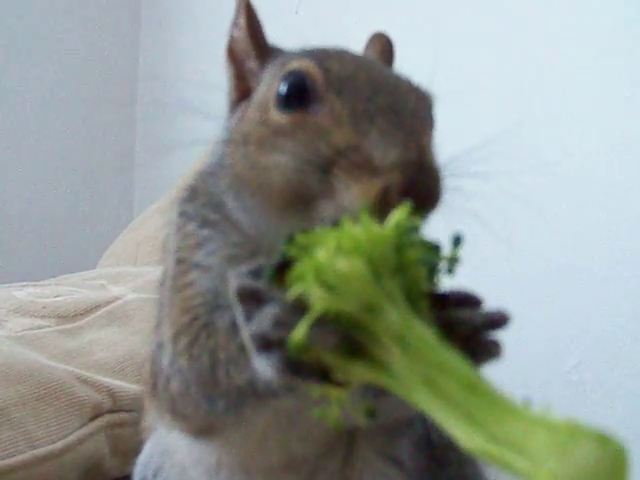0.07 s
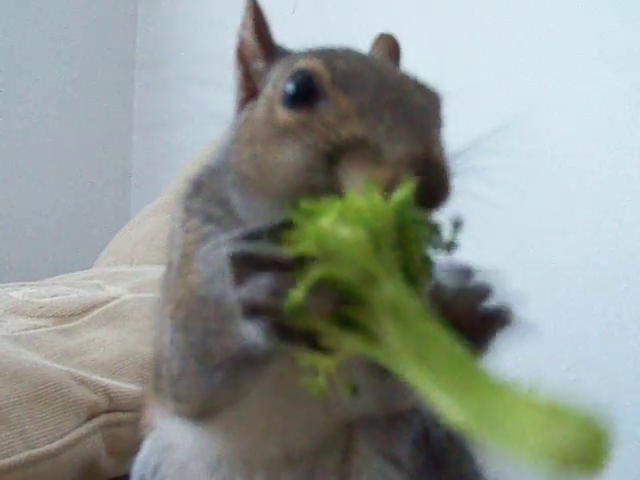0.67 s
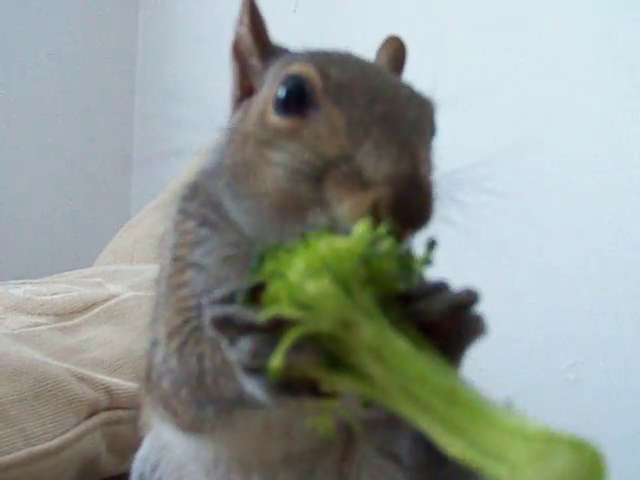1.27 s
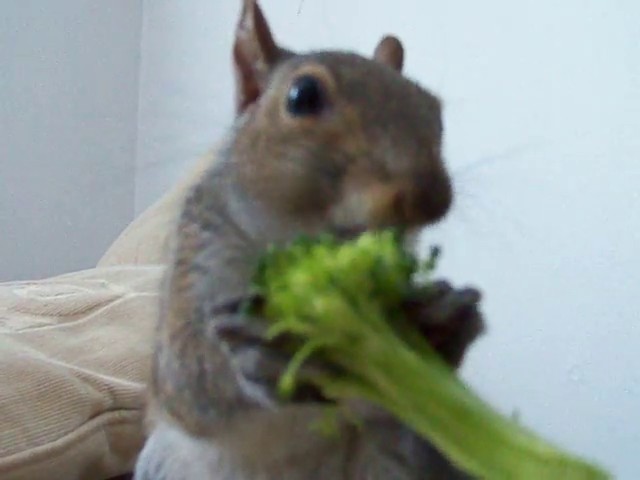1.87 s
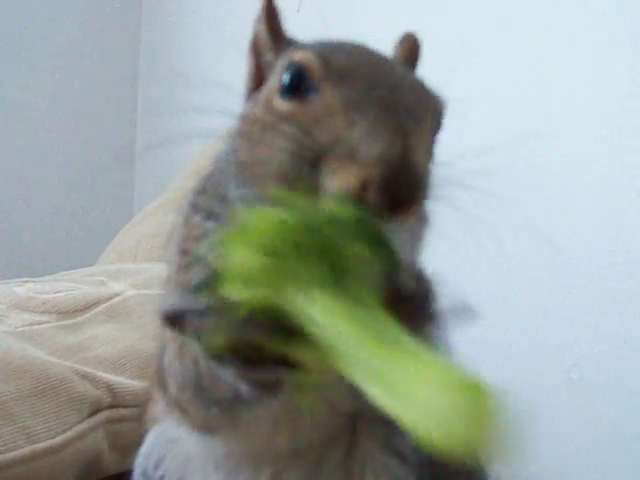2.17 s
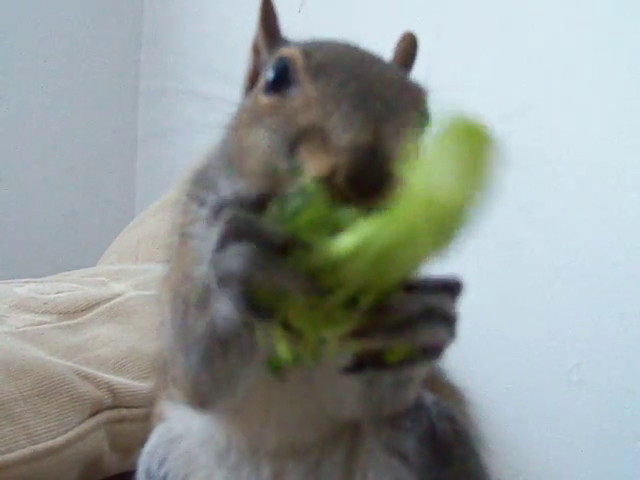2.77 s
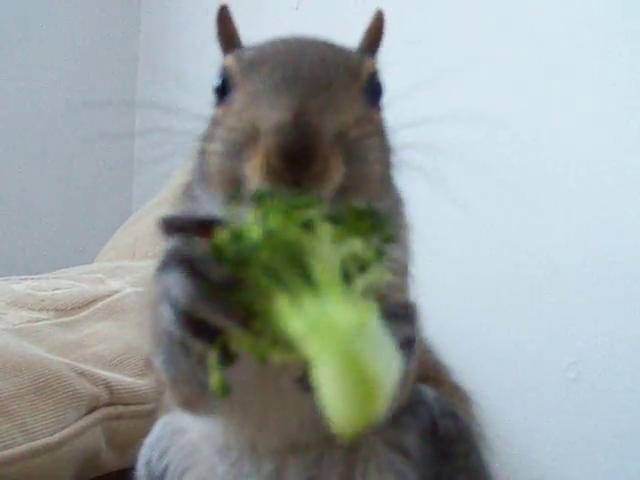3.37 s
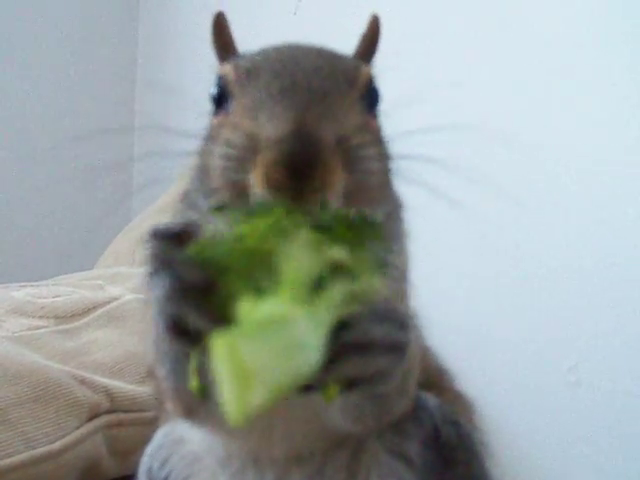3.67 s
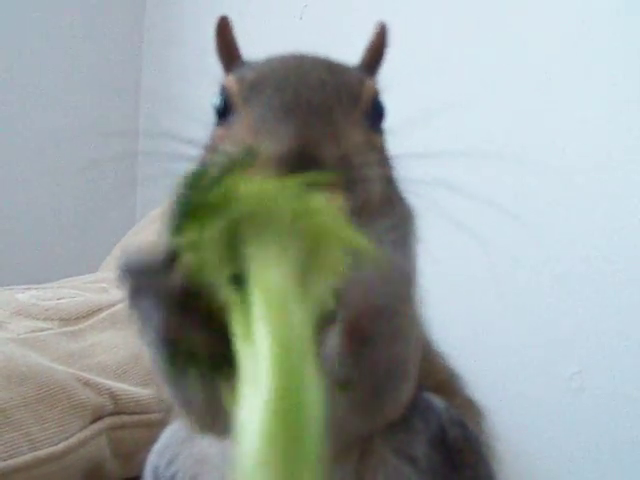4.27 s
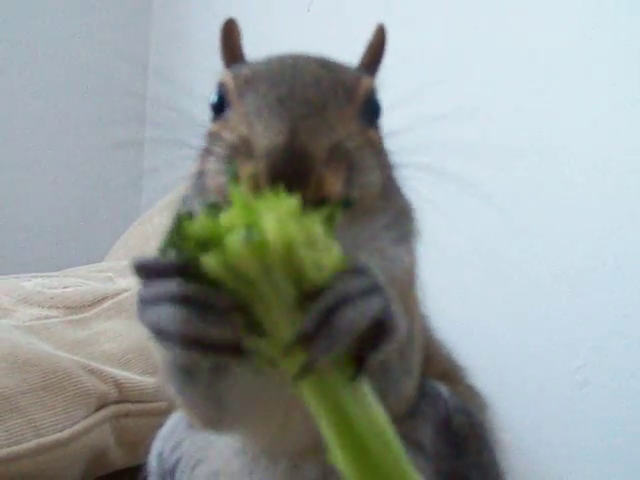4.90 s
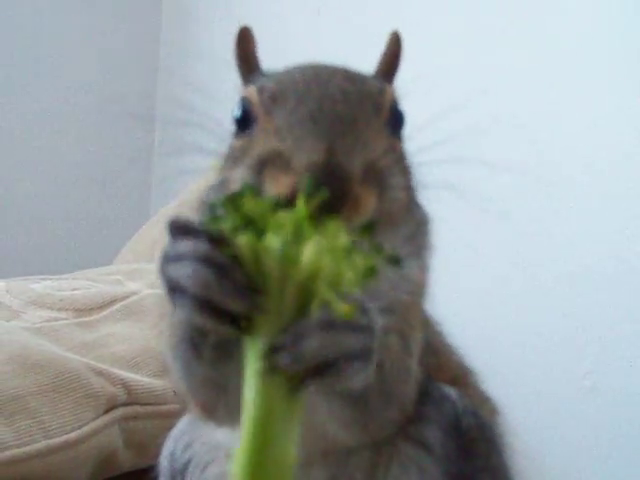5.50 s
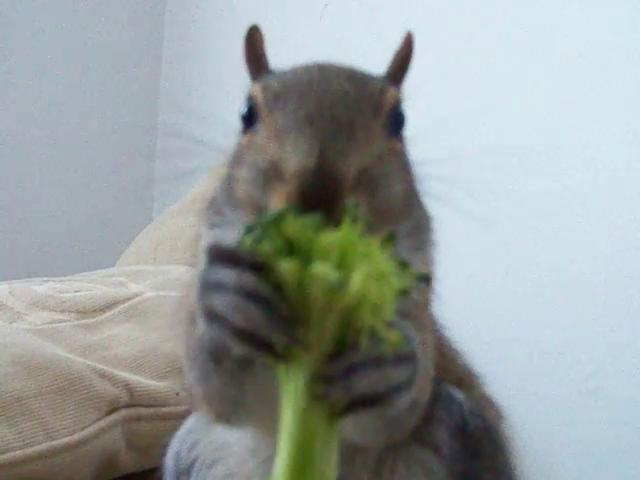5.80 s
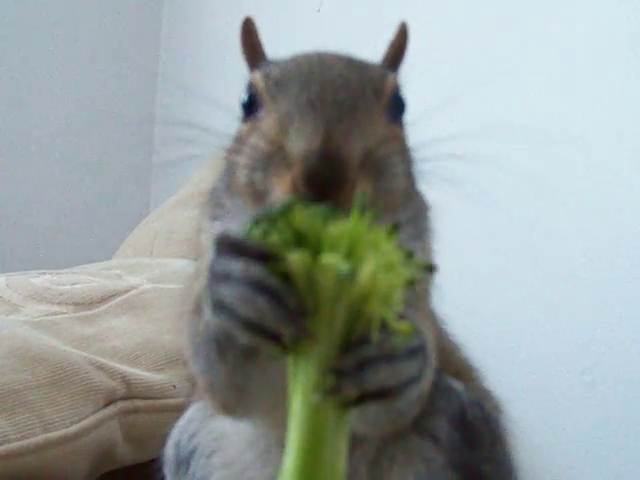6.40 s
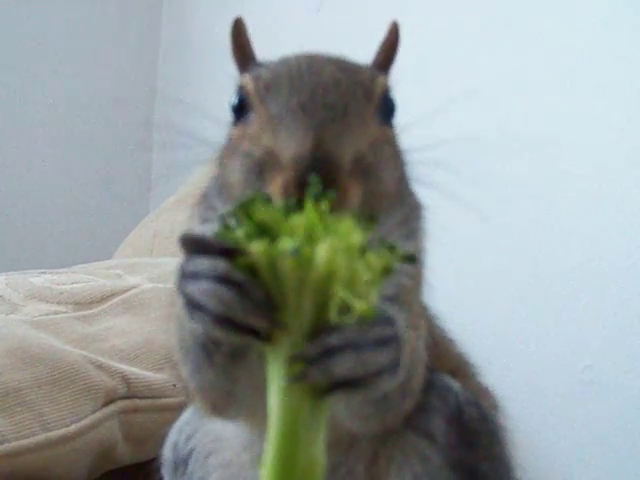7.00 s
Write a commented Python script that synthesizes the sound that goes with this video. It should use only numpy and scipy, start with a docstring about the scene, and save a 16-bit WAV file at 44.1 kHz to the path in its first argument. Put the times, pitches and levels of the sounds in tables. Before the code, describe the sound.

A squirrel nibbles broccoli close to the microphone, with small sharp snaps and soft crunching over a low hum and faint hiss.

```python
"""A squirrel nibbles a broccoli floret close to a small camera microphone in a quiet room.
Its teeth snap crisp stalks in sharp single cracks, and every chew crushes a small cloud of cells.
Under it lie a low mains hum, a faint rumble and a steady hiss."""
import sys
import numpy as np
from scipy import signal
from scipy.fft import rfft, irfft
from scipy.io import wavfile

SR = 44100
rng = np.random.default_rng(int(sys.argv[2]) if len(sys.argv) > 2 else 0)


def wrap_up_sound(samples):
    """Save the sound to the file named by the first command line argument, as 16-bit audio."""
    columns = np.atleast_2d(samples).T
    # keep every value between -1 and 1, then stretch to whole-number steps
    tamed = np.clip(columns, -1, 1)
    steps = np.round(tamed * 32767).astype(np.int16)
    wavfile.write(sys.argv[1], SR, steps)


N = 310905

# stalks snapping: (s, crack dB, ring Hz, ring over crack dB)
SNAPS = [(0.1684, -17.5, 3000, 12), (0.1993, -16, 2050, 5), (0.3566, -17, 2050, 8), (0.3596, -15, 2000, 9),
         (0.7854, -17.5, 6850, 0), (0.8128, -14, 6350, 0), (0.8155, -4, 6400, 17), (0.8158, -2.5, 4330, 16),
         (0.818, -19, 6350, -2), (0.8215, -23, 6750, -4), (0.825, -15.5, 4050, -6), (0.833, -20, 4500, 0),
         (0.8362, -21, 4200, -4), (0.9307, -16, 6700, -3), (0.9334, -10, 4450, 5), (0.9464, -4, 6450, 7),
         (0.95, -5, 4600, 2), (0.9525, -16, 5500, 7), (0.9551, -21, 6200, 2), (0.9594, -13, 6150, 14),
         (0.9864, -13, 6700, 7), (1.0606, -22, 6900, -1), (1.281, -16.5, 6500, -4), (1.314, -14, 2750, 3),
         (1.467, -20, 2800, 5), (1.4699, -17, 2350, 3), (1.498, -13.5, 2900, 3), (1.6264, -11, 1950, 2),
         (1.6308, -15, 2050, 1), (1.633, -15, 2100, 13), (1.6366, -10, 2200, -8), (1.7018, -18, 2550, 10),
         (1.7082, -13.5, 2550, 22), (1.7728, -12.5, 2600, 9), (1.8713, -12, 2150, 4), (2.101, -11.5, 2100, 10),
         (2.1048, -21, 1950, 9), (2.1072, -17, 1900, 16), (2.1096, -18, 2100, 8), (2.1782, -12, 2000, 11),
         (2.3528, -11.5, 2100, 6), (2.4322, -10.5, 1900, 10), (2.4357, -20, 2050, 3), (2.4847, -17, 2450, 3),
         (2.7371, -3, 6450, 16), (2.7402, -11.5, 6700, 5), (2.7436, -12, 6300, 10), (2.7674, -14, 6450, 10),
         (2.8454, -12.5, 5950, 4), (2.9155, -17.5, 3000, 2), (2.9368, -10.5, 6500, -0.5), (2.9615, -18.5, 6150, 6),
         (3.1972, -8.5, 2100, 19), (3.2351, -18.5, 3150, 7), (3.2867, -16.5, 2350, 6), (3.5045, -18.5, 2550, -6),
         (3.529, -13, 2150, 9), (3.592, -18, 2650, -3), (3.606, -15.5, 1900, -3), (3.7671, -11, 1900, 9),
         (3.7709, -11.5, 1900, 4), (3.807, -18.5, 3250, 5), (3.8424, -12, 2100, 14), (3.8463, -8.5, 2050, 10),
         (3.8492, -13.5, 2400, 13), (3.8806, -19, 2950, 28), (3.8922, -14.5, 2800, 16), (3.9221, -19.5, 5500, -1),
         (3.9884, -19, 1900, 1), (4.0159, -11.5, 2550, 7), (4.0187, -15, 2400, 2), (4.1348, -17.5, 7200, 16),
         (4.2496, -16, 2750, 24), (4.2543, -19, 2350, 24), (4.3354, -14, 2050, 8), (4.6663, -20.5, 6350, -2),
         (4.8018, -6, 6500, 12.5), (4.8529, -9.5, 6800, 4.5), (4.963, -9.5, 5850, 12), (4.9661, -8, 6350, 18),
         (4.971, -7.5, 6300, 2), (5.1763, -13, 6600, 6), (5.1766, -11.5, 3040, 20), (5.4205, -17.5, 2700, 4),
         (5.4221, -9.5, 6000, 7), (5.4334, -13, 6350, 6), (5.4572, -14, 6650, 29), (5.5376, -17.5, 2100, 2),
         (5.547, -15, 2300, -2), (5.5541, -11.5, 6450, 5), (5.556, -17, 6650, 8), (5.6026, -11, 7050, 9),
         (5.711, -18, 7400, 20), (5.952, -20, 3000, 20), (6.1171, -17, 2650, 2), (6.1534, -18, 2200, 8),
         (6.1584, -18, 3400, 10), (6.2186, -7.5, 2250, 6), (6.2214, -18.5, 2350, 22), (6.281, -13, 2750, 9),
         (6.3148, -19, 5250, 10), (6.4532, -11, 1900, 1.5), (6.4573, -17, 1900, 4), (6.5229, -14, 2150, 22),
         (6.5256, -16.5, 2300, 24), (6.6911, -10.5, 2350, 6), (6.6956, -18, 2450, 22), (6.8123, -20, 7200, 8),
         (6.8792, -11.5, 6200, 8), (6.8843, -10, 6300, 0), (6.889, -15, 6700, 9)]
# chews that crush many small cells: (s, mouth resonance Hz, mouth dB, crisp crunch dB)
CHEWS = [(0.174, 2620, -64, -65), (0.267, 2650, -60, -66), (0.361, 1900, -65, -63), (0.503, 2100, -61, -66),
         (0.568, 2840, -63, -67), (0.635, 2950, -73, -63), (0.824, 3500, -62, -62), (0.875, 2850, -70, -60.5),
         (0.958, 3250, -67, -56.5), (1.301, 3050, -57.5, -58), (1.363, 2150, -62.5, -62), (1.473, 2600, -59, -59.5),
         (1.631, 2500, -62, -68), (1.781, 2400, -61, -61.5), (1.934, 2880, -63.5, -70), (2.022, 2600, -65, -62),
         (2.111, 2000, -60, -59.5), (2.177, 2600, -63, -64), (2.45, 2100, -65, -63), (2.74, 3000, -66, -75),
         (2.847, 2980, -61, -61), (2.928, 3170, -60, -65), (3.43, 3550, -63, -62.5), (3.528, 2250, -68, -62.5),
         (3.615, 1930, -60.5, -67), (3.767, 2050, -63, -62), (3.894, 2600, -66, -59), (3.936, 2730, -62, -64),
         (4.054, 2950, -69, -66), (4.096, 3250, -68, -64), (4.138, 2500, -68, -64), (4.244, 1900, -63, -65),
         (4.787, 1900, -75, -65), (4.904, 3700, -72, -60.5), (4.99, 2750, -73, -61.5), (5.557, 2980, -63, -65),
         (6.113, 3020, -61.5, -66), (6.16, 2000, -58, -62), (6.3, 2700, -60, -61.5), (6.458, 1950, -62, -71),
         (6.589, 3050, -62, -63.5), (6.885, 3250, -57.5, -73)]
# soft knocks as the paws turn the floret: (s, dB)
KNOCKS = [(3.771, -53), (3.8065, -47)]
# what a knock rings with: (Hz, dB, t60 s)
KNOCK_MODES = [(420, -6, 0.036), (680, 7, 0.013), (910, -2, 0.014)]
# room rumble: (Hz, dB per Hz)
RUMBLE = [(18, -86.5), (29, -78.5), (40, -77.5), (48, -72), (73, -71), (88, -82.5), (104, -76.5), (124, -73.5),
          (162, -75.5), (190, -85.5), (220, -85), (265, -94)]
# hiss: (Hz, dB per Hz)
HISS = [(400, -92), (550, -90.0), (700, -90), (850, -93), (1150, -94), (1500, -96.5), (2200, -97.5),
        (3000, -98), (3700, -99.5), (5200, -100.6), (6700, -100.5), (7500, -101.3), (8400, -103.6)]
# mains hum: (multiple, dB rms)
HUM = [(1, -44), (2, -63.5), (4, -70), (12, -76)]
MAINS_HZ = 58.97   # fixed
# narrow dips in the microphone's response: (Hz, width Hz, depth dB)
DIPS = [(301, 77, -16), (962, 61, -14)]
# background width: (Hz, side minus mid dB)
WIDTH = [(60, -16.5), (150, -12), (350, -6), (1000, -5.5), (7000, -4.5)]
# snaps lean left, those near 4.5 kHz most and the highest hardly at all: (Hz, left minus right dB)
LEAN = [(2500, 11), (4500, 12.5), (6500, -0.5)]
CUTOFF_HZ = 8950   # fixed


def from_db(db):
    """Decibels to gain."""
    return 10 ** (np.asarray(db) / 20)


def at_hz(points, hz):
    """Read a table on a log-frequency axis."""
    known, values = np.transpose(points)
    return np.interp(np.log(np.maximum(hz, 1)), np.log(known), values)


def cut(x, hz, kind, order=2):
    """Butterworth filter."""
    return signal.sosfilt(signal.butter(order, hz, kind, fs=SR, output="sos"), x + 1e-18)


def resonance(x, hz, width_hz):
    """Two-pole resonance with gain 1 on top."""
    r = np.exp(-np.pi * width_hz / SR)
    return signal.lfilter(np.array([1, 0, -1]) * (1 - r * r) / 2, [1, -2 * r * np.cos(2 * np.pi * hz / SR), r * r], x + 1e-18)


def pan(x, lean_db):
    """Share a sound between left and right, keeping its mid level."""
    gains = from_db(np.array([[1], [-1]]) * lean_db / 2)
    return x * gains / gains.mean()


def add(out, s, sound):
    """Mix a short sound in at time s."""
    at = int(np.clip(round(s * SR), 0, N - 1))
    out[..., at:at + sound.shape[-1]] += sound[..., :N - at]


def steady_noise(spectrum):
    """Stereo noise of a given density, wider towards the treble."""
    hz = np.arange(N // 2 + 1) * SR / N
    mid, side = rfft(rng.standard_normal((2, N))) * from_db(at_hz(spectrum, hz)) * np.sqrt(SR / 2)
    side = side * from_db(at_hz(WIDTH, hz))
    return irfft(np.array([mid + side, mid - side]), N)


def snaps(width_hz=850, width_share=0.15, low_hz=1000, low_share=0.31, soft_ratio=2.35, crack_lean_db=6.0, level_db=.5):
    """Each fracture is one sharp crack that rings the broken piece and the mouth for about a millisecond."""
    out = np.zeros((2, N))
    for s, crack_db, hz, ring_db in SNAPS:
        # the smaller the piece, the higher it rings, the faster it breaks and the less bass it radiates
        crack = cut(signal.unit_impulse(512), low_hz + low_share * hz, "high")
        crack = cut(crack, min(soft_ratio * hz, SR / 2.5), "low", order=1)
        width = width_hz + width_share * hz
        ring = from_db(ring_db) * resonance(resonance(crack, hz, width), hz, width)
        both = pan(crack, crack_lean_db) + pan(ring, at_hz(LEAN, hz))
        add(out, s, from_db(crack_db + level_db) * both / (1 + from_db(ring_db)))
    return out


def chewing(chew_s=0.009, per_s=1100, spread_db=8.0, mouth_width_hz=1100, crisp_low_hz=4200, crisp_high_hz=7400, mouth_gain_db=0.0, crisp_gain_db=1.5):
    """Each chew is a swell of pops: inside the mouth they ring its cavity, at the front teeth they stay crisp."""
    out, t = np.zeros((2, N)), np.arange(SR // 10) / SR
    middle = t.mean()
    swell = np.exp(-((t - middle) / (2 * chew_s)) ** 2)
    for s, mouth_hz, mouth_db, crisp_db in CHEWS:
        inside, front = (swell * pops(per_s, spread_db, size=len(t)) for _ in range(2))
        mouth = resonance(resonance(inside, mouth_hz, mouth_width_hz), mouth_hz, mouth_width_hz)
        crisp = cut(front, [crisp_low_hz, crisp_high_hz], "band")
        for sound, db, hz in ((mouth, mouth_db + mouth_gain_db, mouth_hz), (crisp, crisp_db + crisp_gain_db, crisp_high_hz)):
            sound = sound * np.linalg.norm(swell) / np.linalg.norm(sound)
            add(out, s - middle, pan(from_db(db) * sound, at_hz(LEAN, hz)))
    return out


def paws():
    """Dull, quickly damped knocks on the stalk."""
    out, t = np.zeros(N), np.arange(SR // 10) / SR
    knock = sum(from_db(db - 60 * t / t60) * np.sin(2 * np.pi * hz * t) for hz, db, t60 in KNOCK_MODES)
    for s, db in KNOCKS:
        add(out, s, from_db(db) * knock)
    return pan(out, 1.5)


def room(x, near_db=-11, near_t60=0.01, far_db=-13, far_t60=0.27):
    """Near surfaces scatter each crack for some milliseconds; the walls add a faint tail."""
    t = np.arange(SR // 4) / SR
    echoes = 0
    for db, t60 in ((near_db, near_t60), (far_db, far_t60)):
        tail = rng.standard_normal((2, len(t))) * from_db(-60 * t / t60) * (t > .0007)  # fixed
        echoes = echoes + from_db(db) * tail / np.sqrt(np.sum(tail ** 2) / 2)
    return x + signal.fftconvolve(x, echoes, axes=1)[:, :N]


def hum():
    """Steady mains lines."""
    phase = 2 * np.pi * MAINS_HZ * np.arange(N) / SR
    return pan(sum(from_db(db) * np.sqrt(2) * np.sin(round(k) * phase + rng.uniform(0, 2 * np.pi)) for k, db in HUM), 1.8)


def background(hiss_top_hz=8600):
    """Low rumble and broad hiss."""
    rumble = cut(steady_noise(RUMBLE), 288, "low", order=8)
    hiss = cut(cut(steady_noise(HISS), 300, "high", order=4), hiss_top_hz, "low", order=8)
    return pan(rumble + hiss, 1.0)


def pops(per_s, spread_db, size):
    """Cells bursting at random moments, most weakly, a few strongly."""
    heights = from_db(spread_db * np.minimum(rng.exponential(1, size), 3)) * rng.choice([-1, 1], size)
    return heights * (rng.random(size) < per_s / SR)


def jaw(hz=950, width_hz=600, level_db=-18):
    """The jaw jolts shut as each stalk gives way: a faint knock under the crack."""
    jolts = np.zeros(N)
    for s, crack_db, *_ in SNAPS:
        add(jolts, s, from_db([crack_db + level_db]))
    return pan(resonance(resonance(jolts, hz, width_hz), hz, width_hz), 3)


def scene():
    """The squirrel in its room, over hum and hiss."""
    return room(snaps() + jaw() + chewing() + paws()) + hum() + background()


def record(dry, top_hz=7650):
    """The microphone has two narrow dips; the recorder's symmetric low-pass rounds each crack and cuts the top."""
    for hz, width_hz, depth_db in DIPS:
        dry = dry - (1 - from_db(depth_db)) * resonance(dry, hz, width_hz)
    dull = signal.sosfiltfilt(signal.butter(7, top_hz, fs=SR, output="sos"), dry)
    return signal.sosfiltfilt(signal.butter(8, CUTOFF_HZ, fs=SR, output="sos"), dull)  # fixed


dry = scene()
out = record(dry)
wrap_up_sound(out)
```